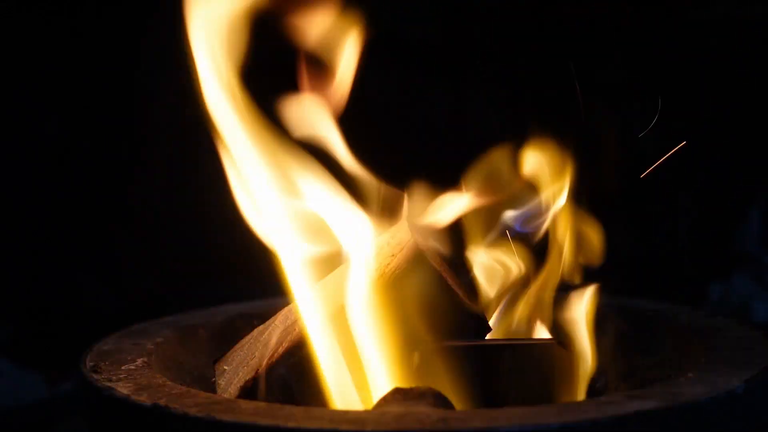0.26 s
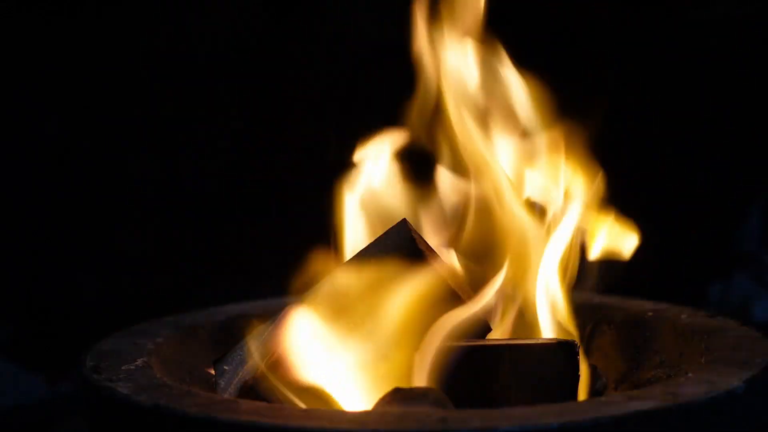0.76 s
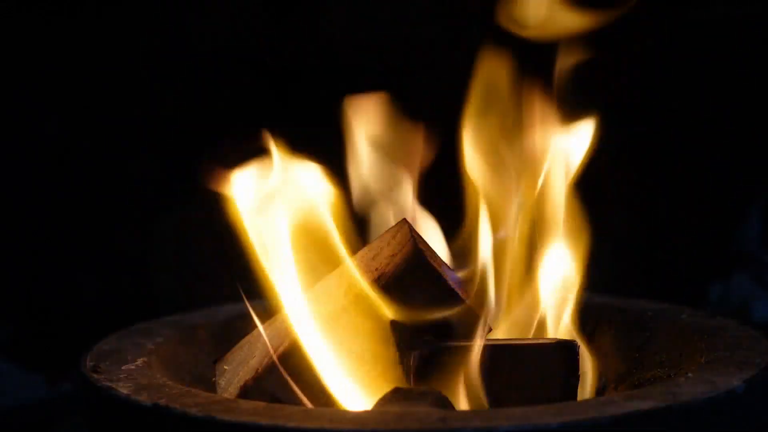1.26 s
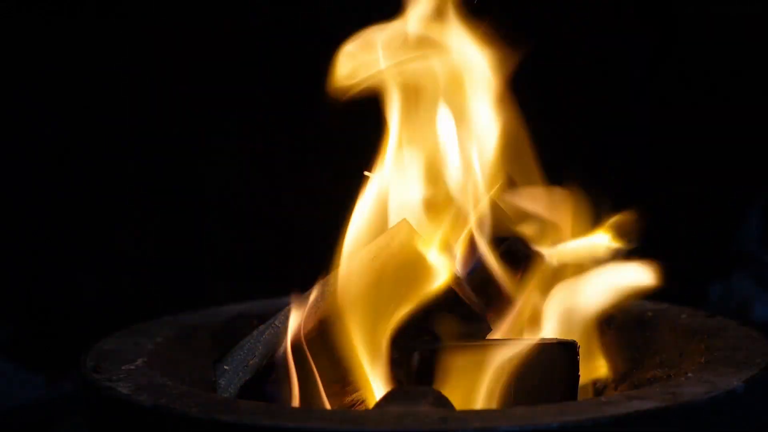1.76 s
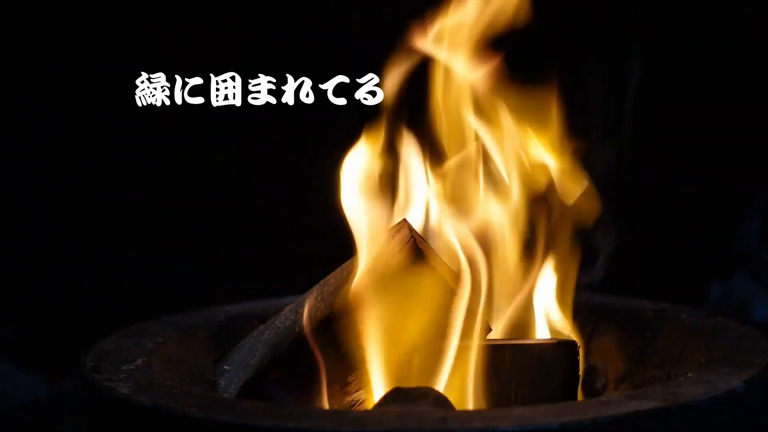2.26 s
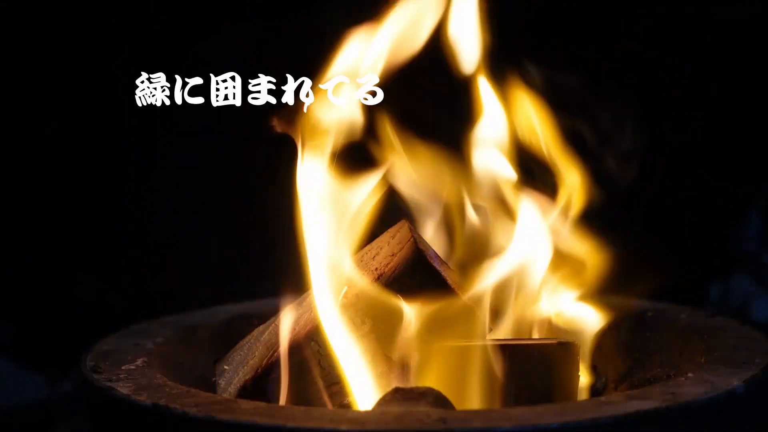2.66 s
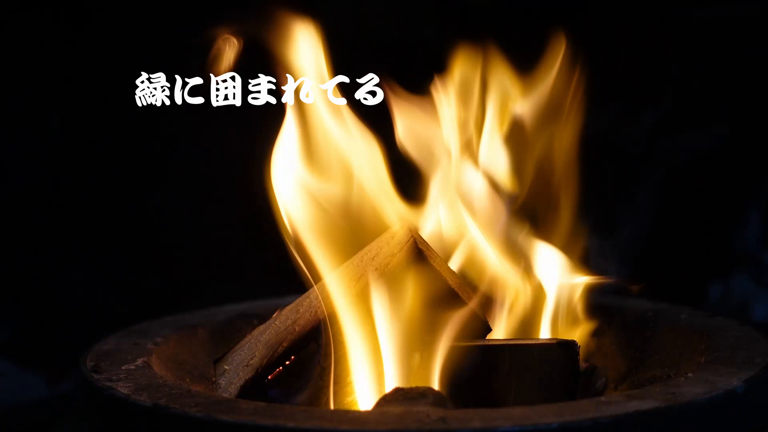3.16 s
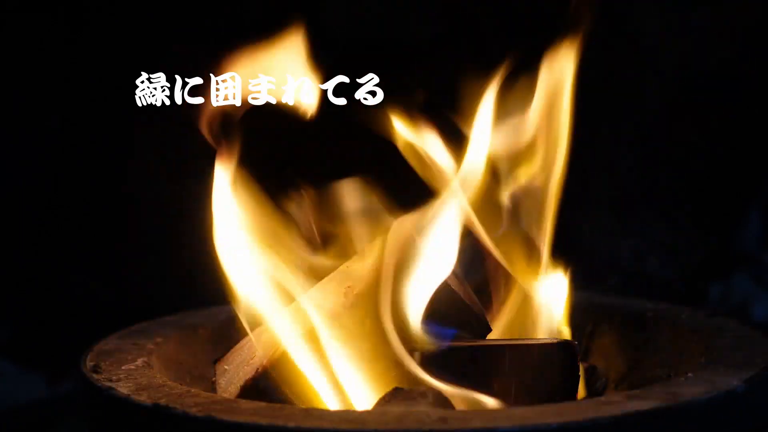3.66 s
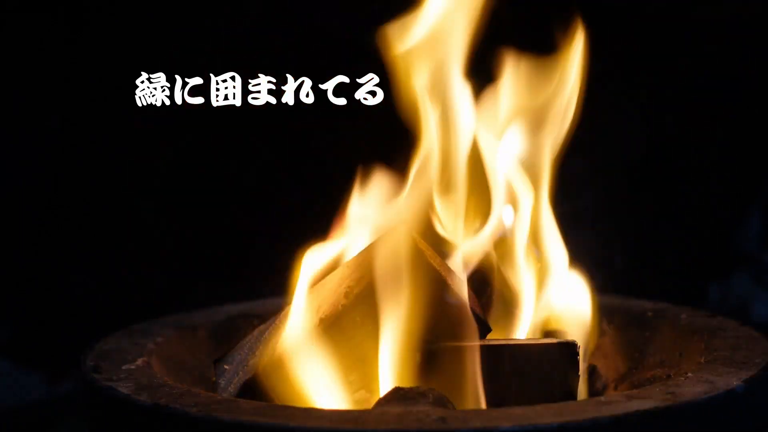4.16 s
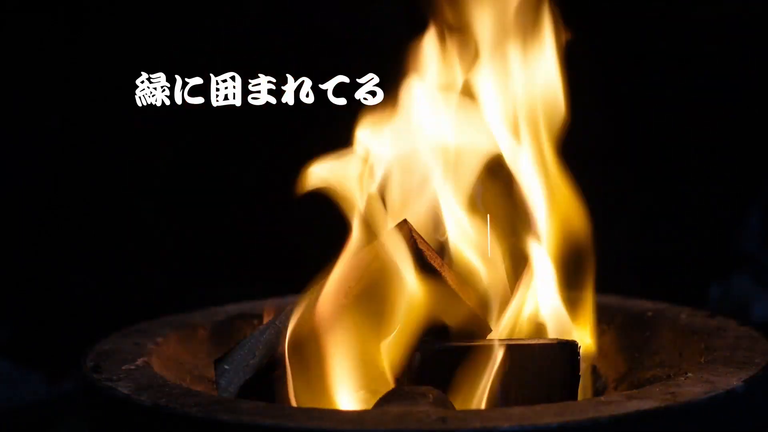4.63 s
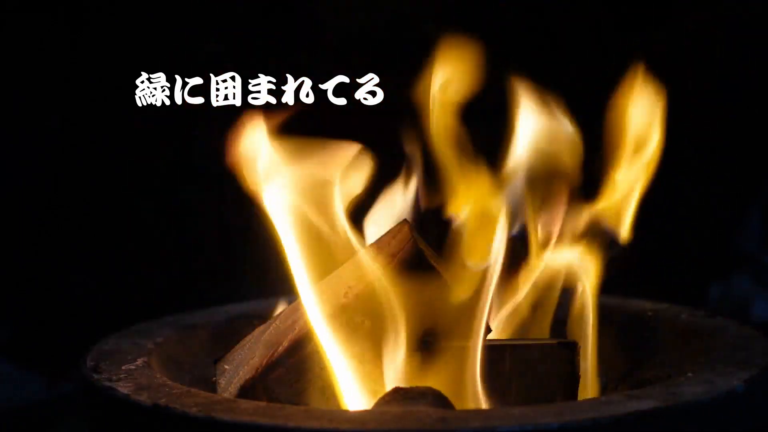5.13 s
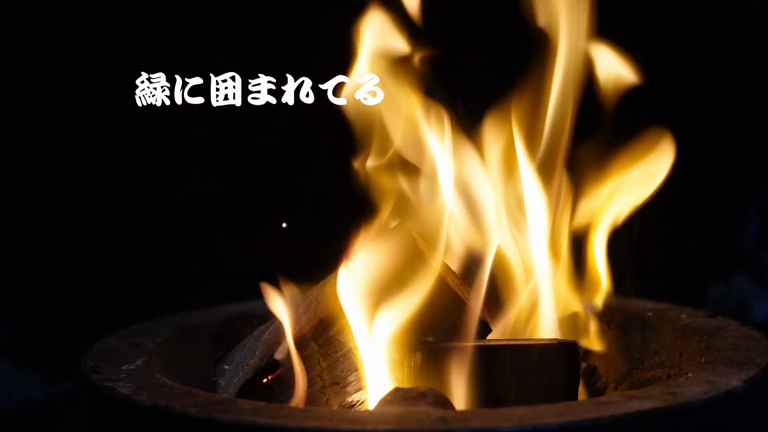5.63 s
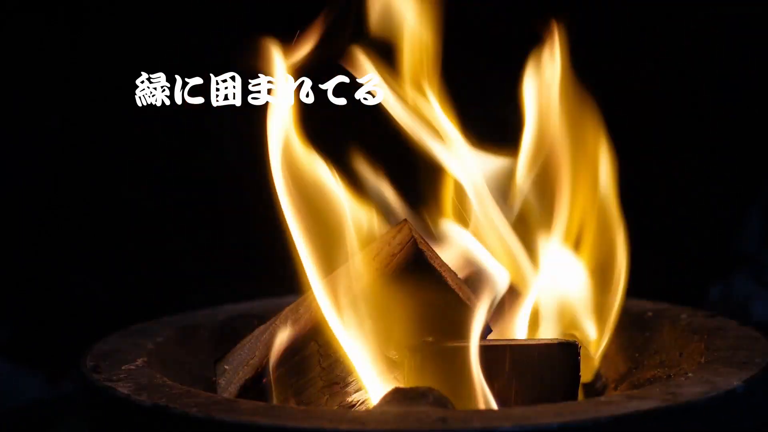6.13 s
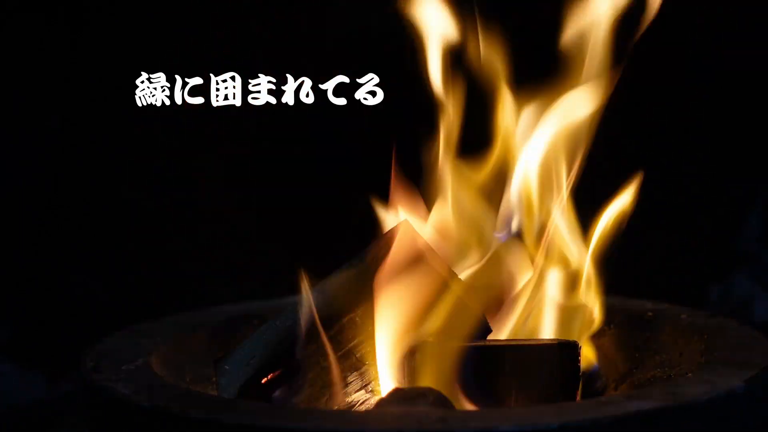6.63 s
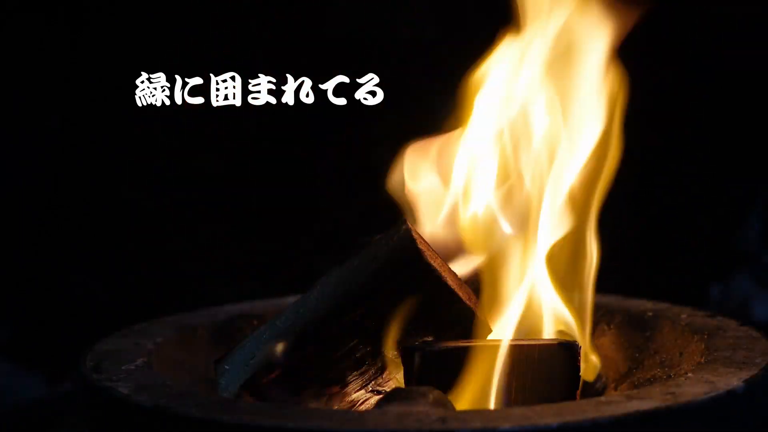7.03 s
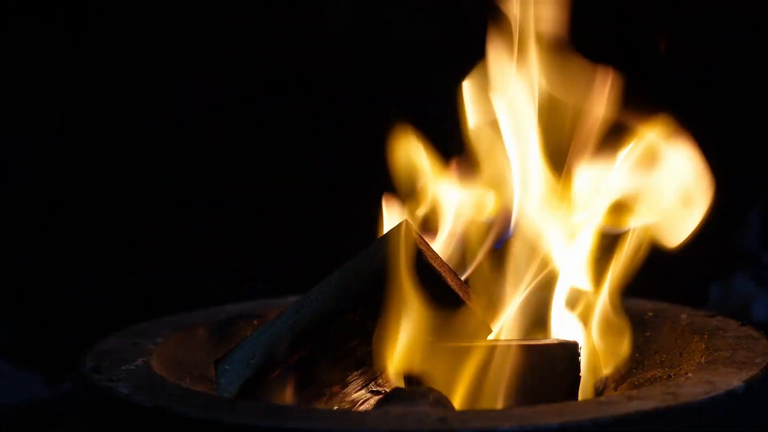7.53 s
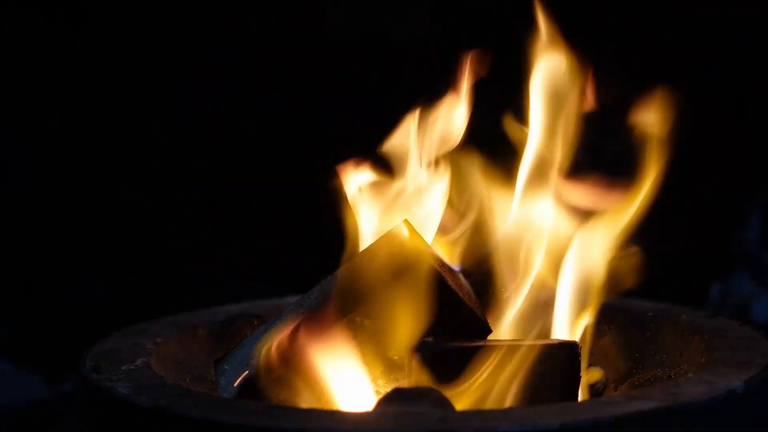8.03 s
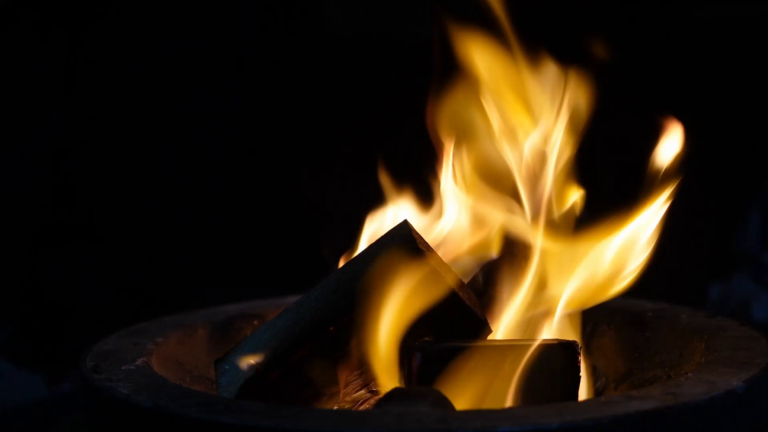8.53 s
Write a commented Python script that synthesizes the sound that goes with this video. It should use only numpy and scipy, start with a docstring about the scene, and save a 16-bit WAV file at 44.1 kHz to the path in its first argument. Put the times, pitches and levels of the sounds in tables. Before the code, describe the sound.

Split firewood crackles close up in a clay bowl, sharp pops and tiny ticks scattered over a low, steady flame rumble.

```python
"""Firewood burning in a clay brazier

Split wood burns outdoors, heard close up on the left channel only; the right is silent.
Steam pockets burst the wood in quick runs of fractures and the charred surface cracks: short filtered clicks.
The harder a break, the more the bowl and surroundings ring on: modes and decaying noise convolved with it.
Tiny ticks of charring fibre come in random flurries; a few flat, bright clicks lie mostly at pops and cracks.
Below them lies the low rumble of the flames with a faint hiss: two bands of slowly varying noise."""
import sys
import numpy as np
from scipy import signal
from scipy.fft import rfft, irfft
from scipy.io import wavfile
from scipy.ndimage import uniform_filter1d

SR = 44100
rng = np.random.default_rng(int(sys.argv[2]) if len(sys.argv) > 2 else 0)


def waveform_to_disk(signal):
    """Save audio, clipped to [-1, 1], as 16-bit WAV at the path in sys.argv[1]."""
    frames = np.transpose(np.atleast_2d(signal))
    scaled = np.clip(frames, -1, 1) * 32767
    samples = np.round(scaled).astype(np.int16)
    wavfile.write(sys.argv[1], SR, samples)


N = 387638

# spectrum of the flame rumble, relative: (frequency [Hz], level [dB])
RUMBLE_SPECTRUM = [(10, -18.5), (22, 0), (45, -1.5), (70, -2), (95, -7.5), (125, -18), (160, -24),
                   (215, -38.5), (290, -47), (450, -52.5), (1000, -80), (3000, -110)]
# spectrum of the hiss of escaping gas, relative: (frequency [Hz], level [dB])
HISS_SPECTRUM = [(400, 0), (4500, 0), (9000, -9), (16000, -20)]
# filter on the ringing tail: (frequency [Hz], gain [dB])
TAIL_COLOUR = [(150, -21.5), (400, 6.5), (900, 6.5), (2000, 5.5), (3500, -3.5), (6000, -2.5), (10000, 4.5),
               (16000, -2.5)]
# modes of the bowl, levels relative to one another: (frequency [Hz], level [dB], t60 [s])
BOWL_MODES = [(734, -22, .7), (918, -23, .7), (943, -20, .7), (1103, -20, .7), (1213, -23, .7),
              (1286, -21, .7), (1476, -20.5, .7), (2018, -22, .7), (2552, -26, .6), (3494, -28, .5),
              (4774, -28, .6), (6057, -25, .5), (7526, -21, .5)]
# flat bright clicks, most of them at a pop or crack: (time [s], level over 1 ms [dB])
BRIGHT_CLICKS = [(0.1006, -49), (0.635, -42), (5.2253, -45.5), (5.571, -54), (5.767, -52), (7.21, -55),
                 (7.676, -49)]
# dips in the strength of the ticks: (middle [s], half length [s], depth [dB])
LULLS = [(0.75, 0.099, -12.5), (2.196, 0.036, -26), (4.215, 0.2, -7), (6.236, 0.071, -21),
         (6.408, 0.044, -12)]
# filter on the ticks: (frequency [Hz], gain [dB])
TICK_COLOUR = [(150, 2), (500, 7.5), (2000, -0.5), (6000, -0.5), (8500, -10.5), (11000, -21.5),
               (16000, -31)]
# steam pockets splitting the wood, levels before the gain and filter of the breaks:
# (time [s], level over 1 ms [dB], pitch of the split [Hz], sharpness Q before limiting [1],
#  time between fractures [ms])
POPS = [(0.0764, -29.5, 3380, 3, .17), (0.2381, -38, 3520, 5, 0.15), (0.6106, -44, 3200, 4.4, .16),
        (0.9442, -40.5, 3180, 5.5, .16), (1.1804, -32, 4430, 4.9, .1), (1.4049, -27.5, 3800, 4.4, .38),
        (1.8557, -22.5, 4300, 4.1, 0.45), (1.9093, -41.5, 3630, 3, 0.63), (1.988, -33, 3730, 2.8, .15),
        (2.1404, -42.5, 3550, 7.1, 0.14), (2.3052, -35.5, 3800, 7.1, .37), (2.6495, -46.5, 3680, 2.7, .16),
        (2.8148, -41.5, 3480, 3.4, 0.15), (2.9068, -46, 3500, 2.2, 0.17), (3.0046, -29, 3400, 1.8, .52),
        (3.1703, -29, 3900, 6.6, .62), (3.3341, -30, 3350, 3.2, .17), (3.4324, -29, 4630, 0.74, .72),
        (3.4449, -34, 4070, 6.9, 0.12), (3.4613, -39, 3700, 1.8, .55), (3.577, -30.5, 4080, 1.1, 0.41),
        (3.77, -37.5, 3080, 3.1, .19), (3.8372, -29.5, 3840, 3.1, 0.42), (4.9233, -33.5, 3870, 2.2, .11),
        (4.934, -22, 3420, 3.6, 0.346), (5.2257, -30.5, 3560, 2.1, .18), (5.4746, -29.5, 3860, 4.2, .38),
        (5.5713, -37, 3200, 7.1, 0.15), (5.8082, -28.5, 3200, 2.6, .18), (6.0923, -39, 4430, 3.4, .3),
        (6.3027, -37.5, 3450, 3.9, 0.16), (6.3943, -41.5, 3450, 3.8, .14), (6.46, -24, 4950, 2.7, .5),
        (6.4964, -31, 3670, 3.6, .15), (6.5589, -41.5, 4100, 2.8, .35), (6.6006, -40.5, 3200, 3.6, .16),
        (6.7735, -40.5, 3800, 1.9, .17), (6.8222, -23, 3480, 6.2, 0.29), (7.2243, -29, 4300, 1.3, 0.72),
        (7.365, -33.5, 4170, 5.5, .34), (7.4026, -30.5, 3430, 2.8, .18), (7.425, -33, 4750, 2.7, .53),
        (7.6332, -36.5, 3840, 4.6, 0.35), (7.83, -29, 2700, 4.4, 0.21), (7.9253, -27, 3780, 3.2, 0.38),
        (8.2275, -37.5, 4800, 2.3, 0.091), (8.5323, -30.5, 3850, 3.5, 0.13),
        (8.7415, -29.5, 3550, 2.4, .16)]
# thin cracks of the charred surface, levels before the same gain and filter:
# (time [s], level over 1 ms [dB])
CRACKS = [(0.0999, -29.5), (0.2126, -30.5), (0.288, -28.5), (0.6346, -34.5), (0.9062, -32.5), (1.0245, -42),
          (1.5073, -34.5), (1.6754, -30), (1.8271, -34.5), (2.0829, -41.5), (2.2798, -39), (2.2958, -36),
          (2.835, -43), (2.929, -39), (3.0357, -39.5), (3.1625, -34), (3.7107, -31.5), (3.9854, -31.5),
          (4.1165, -37), (4.126, -41), (4.3894, -35), (4.5562, -34), (4.7156, -30), (4.7439, -33.5),
          (4.7972, -32.5), (5.0091, -33), (5.1533, -34.5), (5.427, -43), (5.503, -41.5), (5.5267, -29),
          (5.7477, -32.5), (5.7648, -32), (6.0568, -32.5), (6.536, -40.5), (6.8895, -34), (7.1257, -32),
          (7.2466, -25.5), (7.7726, -28.5), (7.7927, -32), (8.1423, -31.5), (8.4207, -29)]
# filter on pops and cracks: (frequency [Hz], gain [dB])
BREAK_COLOUR = [(150, 6.5), (400, -1), (1000, -1), (2000, 3.5), (3500, 7), (6000, 5), (8000, -1.5),
                (10200, -9), (11000, -28.5), (16000, -47.5)]

TOP_HZ = 16000
TAIL_T60_S = 0.43
CRACK_HZ, CRACK_Q, CRACK_GAP_MS = 7190, 1.3, 0.061  # shared by all cracks
FULL_DB = -29  # table level from which a break rings on fully
POP_TAIL_DB, CRACK_TAIL_DB = -9, -14  # share that rings on at full strength
TAIL_LOSS = 1.47  # dB of tail lost for each dB that a break is weaker than full
RUN_GROWTH = 0.55  # dB that the outer fractures gain for each dB that a break is stronger than full


def amp(db):
    """Decibels to amplitude ratio."""
    return 10 ** (np.asarray(db) / 20)


def unit(x):
    """Normalise to an energy of one."""
    return x / np.sqrt(np.sum(x ** 2))


def colour(x, points, size=8192):
    """Minimum-phase filtering: folding the cepstrum of a gain curve makes its response causal."""
    hz, db = np.transpose(points)
    f = np.maximum(np.fft.rfftfreq(size, 1 / SR), 1)
    gain_db = np.interp(np.log(f), np.log(hz), db)
    cepstrum = irfft(np.log(amp(gain_db)))
    cepstrum[1:size // 2] *= 2
    cepstrum[size // 2 + 1:] = 0
    response = irfft(np.exp(rfft(cepstrum)))
    return signal.fftconvolve(x, response)[:len(x)]


def noise(points):
    """Spectral shaping of white noise, normalised to an rms of one."""
    return unit(colour(rng.standard_normal(N), points)) * np.sqrt(N)


def slow_random(rate):
    """Moving average of random steps, rate per second, with a standard deviation of one."""
    k = int(SR / rate)
    steps = np.repeat(rng.standard_normal(N // k + 1), k)[:N]
    smooth = uniform_filter1d(steps, k)
    return smooth / smooth.std()


def add(track, s, sound):
    """Superposition: mix a sound into the track at time s."""
    i = int(np.clip(s * SR, 0, N - 1))
    track[i:i + len(sound)] += sound[:N - i]


def resonance(f, centre, sharpness):
    """Second-order band-pass resonance, with Q limited to 0.5 to 6."""
    band = 1j * f / (centre * np.clip(sharpness, .5, 6))
    return band / (1 - (f / centre) ** 2 + band)


def snap(hz, q, gap_ms, before, after, crack, knock=0, knock_hz=1000, size=256):
    """Impulsive excitation of a resonance: up to three fractures, the main one also knocking the log."""
    f = np.fft.rfftfreq(size, 1 / SR)
    one_ms = -2j * np.pi * f / 1000  # phase of a 1 ms delay
    first = before * np.exp(-one_ms * gap_ms)
    last = after * np.exp(one_ms * gap_ms)
    split = resonance(f, hz, q) * (1 + first + last)
    wood = split + crack + knock * resonance(f, knock_hz, 1.0)  # crack is a flat impulse
    # the main break falls 1 ms in; the rms over 1 ms is one
    return unit(irfft(wood * np.exp(one_ms))) * np.sqrt(SR / 1000)


def flames(rumble_db=-44, surge_db=0.5, hiss_db=-91.0, flicker_db=2):
    """Turbulent combustion noise: a rumble surges a little with the draught, a faint hiss flickers above."""
    rumble = noise(RUMBLE_SPECTRUM) * amp(rumble_db + surge_db * slow_random(3.3))
    hiss = noise(HISS_SPECTRUM) * amp(hiss_db + flicker_db * slow_random(6.7))
    return rumble + hiss


def surroundings(x, bowl_db=3.5, clump_db=3):
    """Convolution with an impulse response: clumped, exponentially decaying echoes plus bowl modes."""
    t = np.arange(SR) / SR

    def decay(t60):
        return np.exp(-np.log(1000) * t / t60)

    clumps = amp(clump_db * slow_random(300)[:SR])
    echoes = unit(rng.standard_normal(SR) * clumps * decay(TAIL_T60_S))
    bowl = sum(amp(db) * unit(np.sin(2 * np.pi * hz * t) * decay(t60)) for hz, db, t60 in BOWL_MODES)
    response = colour(echoes, TAIL_COLOUR) + amp(bowl_db) * bowl
    return signal.fftconvolve(x, response)[:N]


def bright_clicks():
    """Near-ideal impulse: a two-sample click of almost flat spectrum adds crisp treble."""
    out = np.zeros(N)
    click = np.sqrt(SR / 1000) * unit(np.array([1, -.2]))
    for s, db in BRIGHT_CLICKS:
        add(out, s, amp(db) * click)
    return out


def lull(s):
    """Gaussian attenuation: dB added to the tick level at time s, near zero but for a few smooth dips."""
    return sum(depth_db * np.exp(-((s - middle) / half) ** 2) for middle, half, depth_db in LULLS)


def ticks(rate=130, flurry=1.0, least_db=-68, spread_db=9, most_db=-45, tick_hz=4400, tick_q=1.57):
    """Random point process of varying rate: fibres snap in flurries, many faint and a few clear."""
    out = np.zeros(N)
    busy = np.exp(flurry * slow_random(35))
    chance = rate / SR * busy / busy.mean()  # rate is the mean number per second
    times = np.flatnonzero(rng.random(N) < chance) / SR
    luck = rng.random((len(times), 6))
    for s, (strength, pitch, damping, gap_ms, second, limit) in zip(times, luck):
        drawn_db = least_db - spread_db * np.log(strength)
        db = min(drawn_db, most_db - 6 * limit) + lull(s)
        hz = tick_hz * 2 ** (1.1 * (pitch - .5))
        q = tick_q * (.5 + damping)
        add(out, s, amp(db) * snap(hz, q, gap_ms, before=0, after=second, crack=0))
    return colour(out, TICK_COLOUR)


def breaks():
    """Nonlinear excitation: lists (s, dB, Hz, Q, gap ms, tail dB), harder breaks ringing on more."""
    def weakness(db):
        return TAIL_LOSS * min(db - FULL_DB, 0)

    deep = [(s, db, hz, q, gap_ms, POP_TAIL_DB + weakness(db)) for s, db, hz, q, gap_ms in POPS]
    thin = [(s, db, CRACK_HZ, CRACK_Q, CRACK_GAP_MS, CRACK_TAIL_DB + weakness(db)) for s, db in CRACKS]
    return deep + thin


def pops_and_cracks(lead_s=.0011, break_db=-3.0, splinter_db=-16.5, early_s=0.0036, late_s=0.0059,
                    knock=0.073, count=5):
    """Sudden release of strain amid tearing fibres; returns the direct sound and the share that rings on."""
    direct, ringing = np.zeros(N), np.zeros(N)
    events = breaks()
    luck = rng.random((len(events), 3, count))
    for (s, db, hz, q, gap_ms, tail_db), draws in zip(events, luck):
        run = amp(RUN_GROWTH * max(db - FULL_DB, 0))
        fractures = snap(hz, q, gap_ms, before=0.32 * run, after=0.42 * run, crack=0.17, knock=knock)
        burst = amp(db + break_db) * fractures
        add(direct, s - lead_s, burst)
        add(ringing, s, burst * amp(tail_db))
        for when, pitch, gap in draws.T:
            # fibres tear just before and after the break, strongest next to it
            away = 2 * when - 1
            delay = away * (late_s if away > 0 else early_s)
            splinter = snap(4200 * 2 ** (pitch - .5), 0.76, gap, before=0, after=gap, crack=0)
            level = amp(db + splinter_db - 10 * abs(away))
            add(direct, s - lead_s + delay, level * splinter)
    return colour(direct, BREAK_COLOUR), colour(ringing, BREAK_COLOUR)


def scene(tick_tail_db=-24):
    """Superposition of all sources at one microphone on the left channel; the right is silent."""
    direct, ringing = pops_and_cracks()
    crackle = ticks()
    tail = surroundings(ringing + amp(tick_tail_db) * crackle)
    fire = direct + crackle + bright_clicks() + tail + flames()
    return np.array([fire, np.zeros(N)])


def record(dry):
    """Band limiting: a steep elliptic low-pass in the recorder cuts the top."""
    low_pass = signal.ellip(8, .2, 70, TOP_HZ, fs=SR, output="sos")
    return signal.sosfilt(low_pass, dry)


dry = scene()
out = record(dry)
waveform_to_disk(out)
```